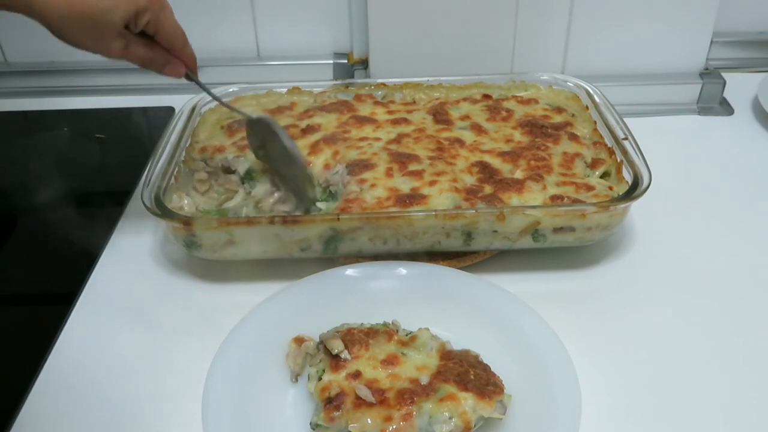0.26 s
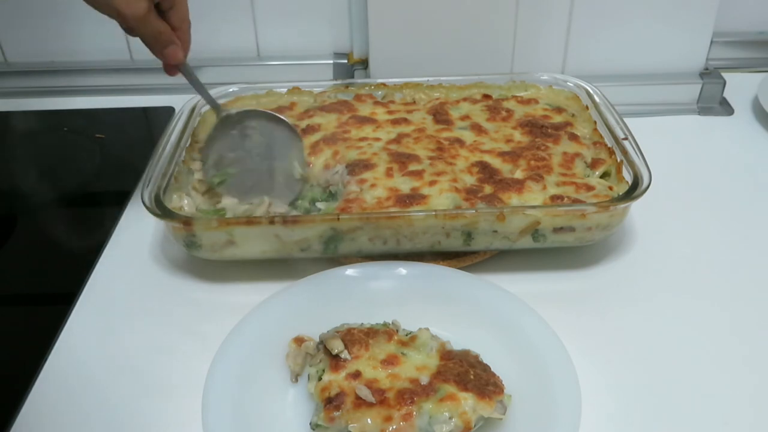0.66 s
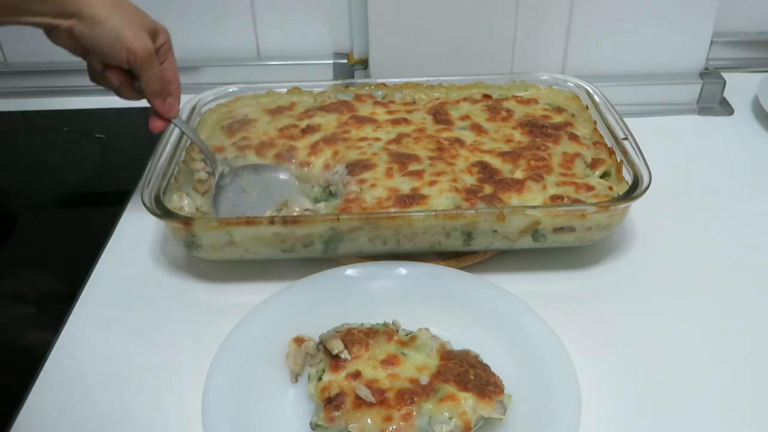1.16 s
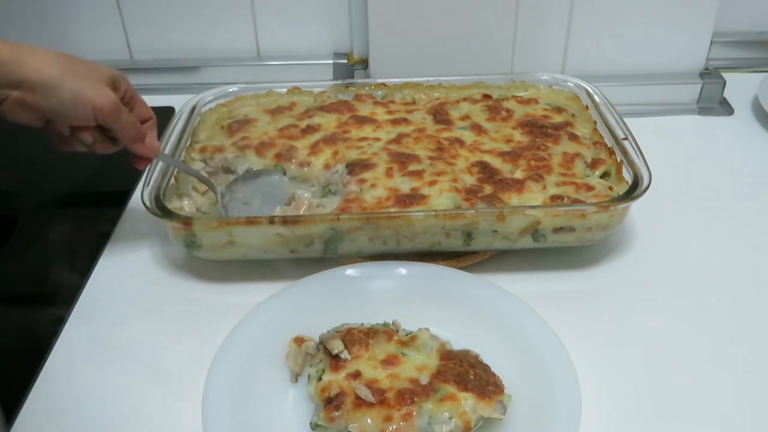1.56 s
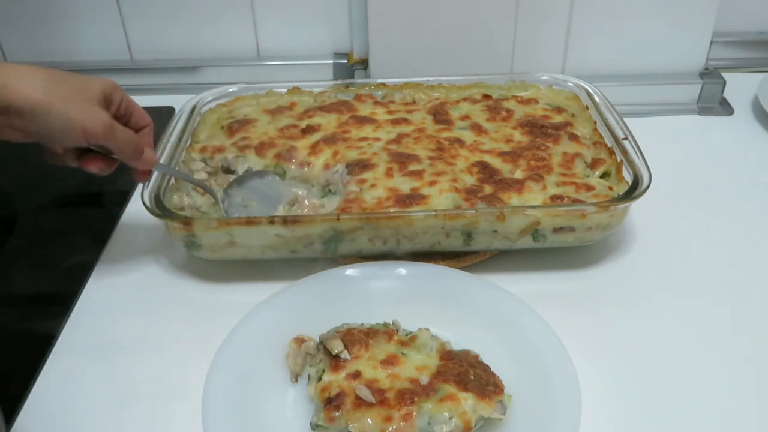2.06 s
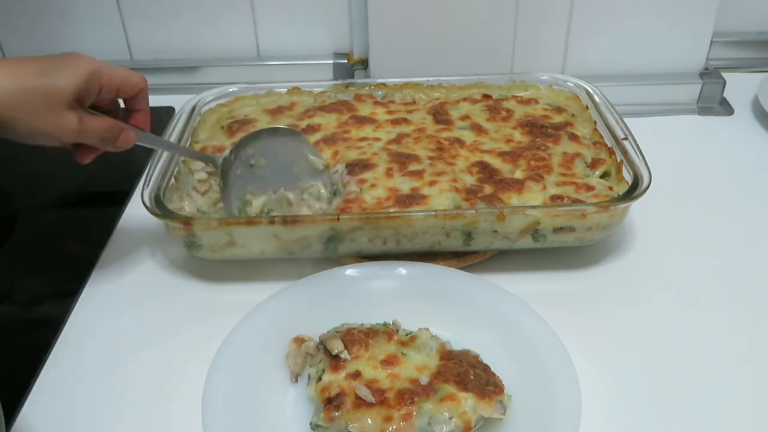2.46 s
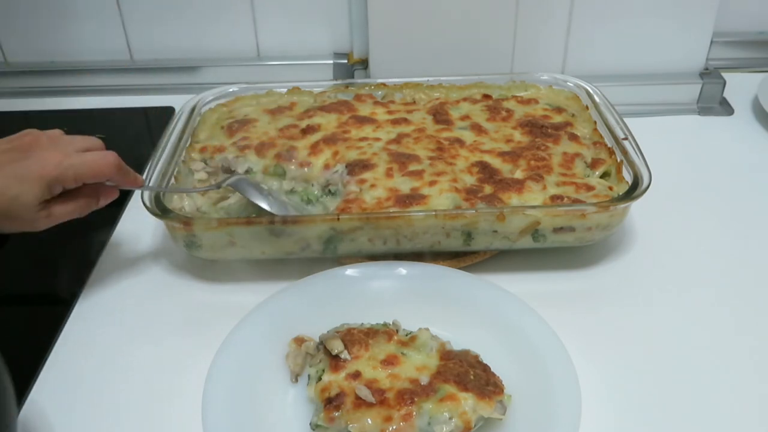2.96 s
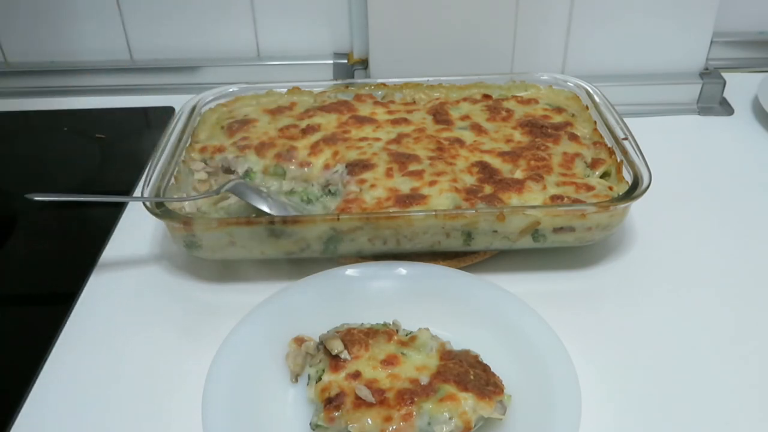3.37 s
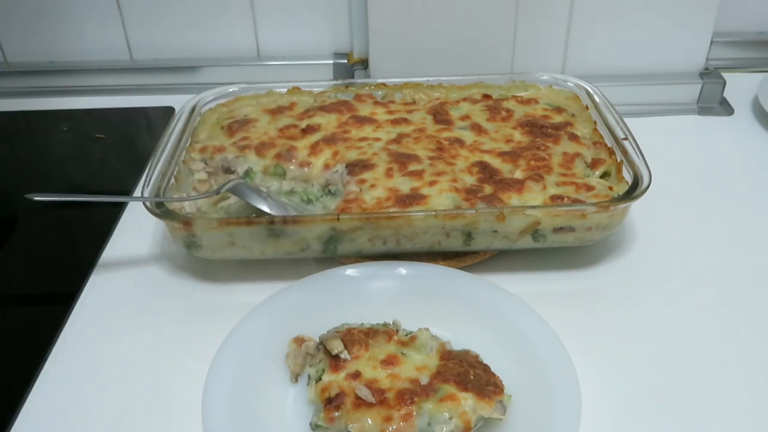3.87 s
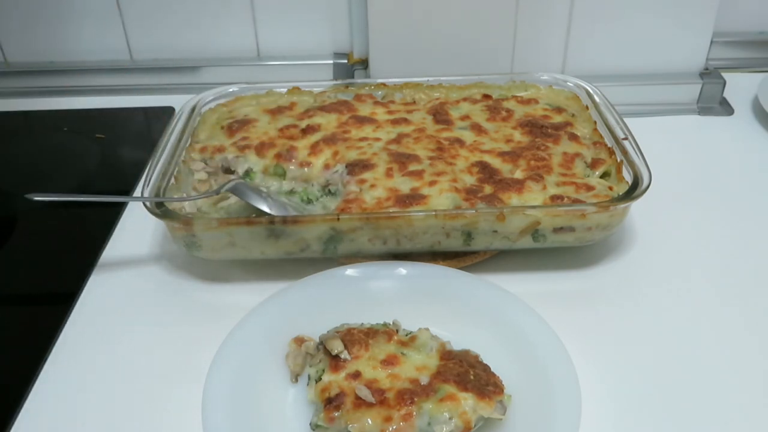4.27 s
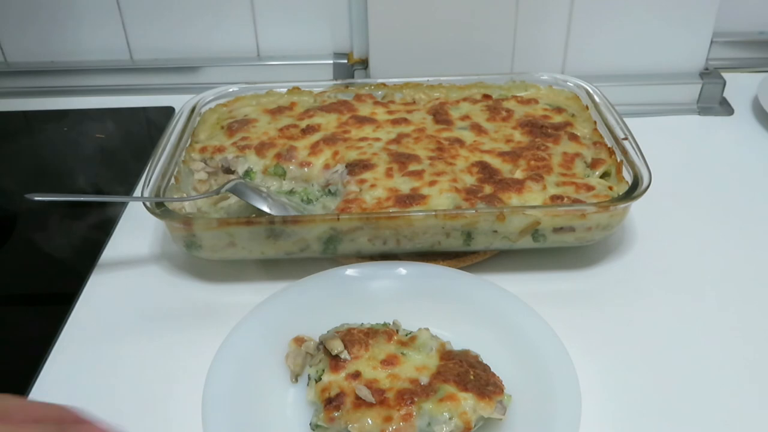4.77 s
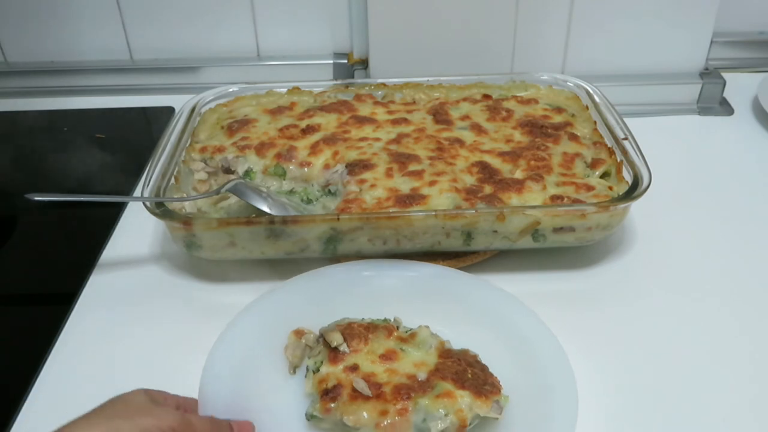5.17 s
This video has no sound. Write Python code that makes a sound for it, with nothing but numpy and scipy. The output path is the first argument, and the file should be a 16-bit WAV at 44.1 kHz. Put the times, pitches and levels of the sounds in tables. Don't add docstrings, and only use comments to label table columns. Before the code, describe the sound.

In a small tiled kitchen with a constant low appliance hum, a metal serving spoon raps a food-filled glass dish several times, rubs lightly and stirs moist food. It scrapes with a short singing tone, drops with a loud clack and clinks again. After soft rustles, a plate thumps down on the counter, rattles and is nudged. Close stereo microphone.

```python
import sys
import numpy as np
from scipy import signal
from scipy.fft import rfft, irfft, next_fast_len
from scipy.io import wavfile

SR = 44100
rng = np.random.default_rng(int(sys.argv[2]) if len(sys.argv) > 2 else 0)


def convert_level_to_amplitude(level_db):
    exponent = np.asarray(level_db, float) / 20
    return 10 ** exponent


def materialize(psi):
    bounded = np.clip(np.atleast_2d(psi).T, -1, 1)
    quanta = np.round(bounded * 32767).astype(np.int16)
    wavfile.write(sys.argv[1], SR, quanta)


N = 238580

# freq_hz, width_hz, level_db
TURN_MODES = [(780, 130, -3.5), (870, 66, -0.5), (1020, 55, 0), (1253, 120, -5.5), (1530, 71, -2.5),
              (1670, 78, -1), (1850, 43, -6), (2130, 39, -12), (2634, 81, -14), (6850, 200, -28)]


def rms_one(x):
    return x / np.sqrt(np.mean(x ** 2) + 1e-20)


def peak_one(x):
    return x / np.abs(x).max()


def spectrum(points, size):
    hz = np.maximum(np.arange(size // 2 + 1) * SR / size, 1)
    p = np.array(points)
    return convert_level_to_amplitude(np.interp(np.log(hz), np.log(p[:, 0]), p[:, 1]))


def colour(x, points):
    size = x.shape[-1]
    return irfft(rfft(x) * spectrum(points, size), size)


def thud(points, size):
    cepstrum = irfft(np.log(spectrum(points, size)), size)
    cepstrum[1:size // 2] *= 2
    cepstrum[size // 2 + 1:] = 0
    return irfft(np.exp(rfft(cepstrum)), size)


def band(x, lo_hz, hi_hz):
    return signal.sosfilt(signal.butter(2, [lo_hz, hi_hz], "band", fs=SR, output="sos"), x)


def body(x, modes, sharp=0.94):
    out = 0
    for k, (hz, width_hz, db) in enumerate(modes):
        r = np.exp(-np.pi * width_hz / sharp / SR)
        b = (1 - r * r) / 2 * np.array([1, 0, -1]) * convert_level_to_amplitude(db) * (-1) ** k
        a = [1, -2 * r * np.cos(2 * np.pi * hz / SR), r * r]
        out = out + signal.lfilter(b, a, x + 1e-18)
    return out


def stereo(mid, side):
    # freq_hz, side_minus_mid_db
    side_share = [(60, -75), (150, -28), (380, -12), (950, -8), (2380, -4.5), (5980, -0.5), (15000, 1)]
    side = colour(side, side_share)
    return np.array([mid + side, mid - side])


def grit(per_s, spread_db, size):
    sizes = convert_level_to_amplitude(spread_db * np.minimum(rng.exponential(1, size), 4)) * rng.choice([-1, 1], size)
    return rms_one(sizes * (rng.random(size) < per_s / SR))


def drift(rate_hz, size):
    knots = rng.standard_normal(size // 256 + 2)
    return np.interp(np.arange(size) / SR * rate_hz, np.arange(len(knots)), knots)


def add(out, piece, s):
    at = round(s * SR)
    out[at:at + len(piece)] += piece[:N - at]


def hum():
    # freq_hz, width_hz, level_db
    drone = [(90.5, 9.8, -11.5), (129.7, 5.3, -4.5), (159.5, 6.45, -5.5), (203.3, 8.9, -9.5),
             (221.3, 17, -12), (302.8, 14, -13), (401.2, 12, -11.5), (422, 27, -18.5)]
    # freq_hz, level_db
    mains = [(53.5, -50), (126.6, -42.5), (400, -52.5)]
    # freq_hz, density_db
    air = [(15, -10), (35, 6), (48, -35.5), (65, -5), (100, -9), (170, -17), (300, -15), (450, -17),
           (560, -16), (1070, -24), (3000, -33), (12200, -49), (16000, -57)]
    # freq_hz, width_hz, level_db
    whine = [(10500, 270, -5.5), (12500, 170, 9.5)]
    t = np.arange(N) / SR
    channels = []
    for noise in rng.standard_normal((2, 3, N)):
        low = convert_level_to_amplitude(-39) * rms_one(body(noise[0], drone))
        hiss = convert_level_to_amplitude(-42) * rms_one(colour(noise[1], air))
        channels.append(low + hiss + convert_level_to_amplitude(-79) * rms_one(body(noise[2], whine)))
    mid, side = channels
    for hz, db in mains:
        mid = mid + np.sqrt(2) * convert_level_to_amplitude(db) * np.sin(2 * np.pi * hz * t)
    return stereo(mid, side)


def knocks():
    # contact_s, peak_db, ring_share_db, ring_length_factor, crack_db
    blows = [(0.5541, -6, 2, 0.91, -24), (0.7181, -10.5, 5.5, 1.1, -14), (1.1537, -15.5, -1, 0.61, -11),
             (2.0286, -25, -1, 0.72, -13), (2.8578, -1.5, -3, .55, -12), (3.1488, -9.5, -3.5, 0.67, -11),
             (4.2575, -2.5, -6, 0.32, -13.5), (4.3197, -8.5, -6.5, 0.256, -17.5),
             (4.4548, -12, -9, 0.55, -31), (5.191, -28, -5, 1, -16), (5.2165, -28, 2.5, 1, -18)]
    # tick_ahead_s, chatter_share, chatter_length_s, ring_to_room_db
    landings = [(.0007, 0.043, .001, -11), (.0005, .2, .002, -12), (.0003, 0.14, 0.00097, -7),
                (.0007, .05, 0.00092, -7), (.0016, 0.094, 0.0011, -7), (.0007, .1, .0015, 0),
                (.0007, .03, 0.0013, -2), (.0003, 0.13, 0.0021, -2.5), (.001, .25, .002, -8),
                (.001, .3, .003, -10), (.002, .5, 0.0058, -10)]
    # start_s, level_db against its knock
    rebounds = [(0.5639, -8), (.7232, -8), (2.8655, -11.5), (2.869, -11), (3.1584, -7.5), (3.1803, -12.5),
                (4.259, -6), (4.269, -15), (4.2793, -12), (4.293, -16), (4.3216, -11), (4.4584, -1),
                (4.4695, -4), (4.4775, -4.5), (4.488, -8), (4.4946, -8), (5.1953, 1.5), (5.2265, -6)]
    # freq_hz, width_hz, level_db
    rim = [(1020, 87, -4.5), (1240, 57, -5), (1536, 94, 0.5), (1880, 68, -2), (2080, 55, -17),
           (2770, 130, -6.5), (3510, 140, -10), (4220, 280, -21), (5190, 120, -20), (6420, 106, -28),
           (7060, 190, -24)]
    bowl = [(1300, 99, -5), (1550, 100, 2), (1880, 140, -3), (2190, 71, -3.5), (2700, 130, -6.5),
            (3620, 164, -11), (4080, 108, -1), (4360, 80, -4), (5260, 88, -7), (7290, 270, -20.5),
            (8410, 220, -18), (10560, 100, -31), (12900, 155, -22.5)]
    corner = [(600, 83, 0), (700, 30, -8), (780, 24.5, -20), (1500, 30, -8), (1735, 32, 5), (1880, 4.5, 2),
              (2610, 41, -8), (3280, 107, -2.5), (3620, 190, -4.5), (4116, 37, -9), (5680, 160, -8.5),
              (9100, 51, -33)]
    bottom = [(535, 110, 8), (1016, 33, 1), (1474, 40, -3), (1880, 50, 1), (2620, 54, -18.5),
              (3820, 61, -1), (6450, 83, -30)]
    drop = [(670, 150, -7), (1003, 49, 4), (1400, 110, -14), (1582, 16, 8), (1765, 120, 0), (2220, 33, -4),
            (2600, 29, -3.5), (3430, 33, -30.5), (4070, 80, -40), (5460, 73, -14), (6700, 120, -23),
            (10100, 81, -39)]
    handle = [(576, 26, 2), (989, 35, 10.5), (1020, 17, -21), (1500, 13, 10), (1690, 17, 16.5),
              (1920, 47, 11.5), (2100, 67, -8), (2760, 33, 6), (3043, 89, 6), (3520, 74, -2),
              (5660, 31, -3), (8200, 64, -20)]
    plate = [(418, 44, -1), (485, 43, -1.5), (545, 43, 2.5), (720, 54, 9.5), (809, 26, -2),
             (1270, 73, -1.5), (1390, 88, 0), (2330, 140, -10), (3170, 66, -6), (4090, 60, -8.5)]
    table = [(480, 48, -3), (820, 61, -1.5), (1160, 51, 1), (1600, 30, -9), (1970, 43, -6),
             (2620, 110, -11), (3100, 206, -18), (4240, 390, -31)]
    nudge = [(1160, 160, -1), (1850, 80, -7), (3670, 91, -9), (4060, 150, -15), (4530, 91, -10),
             (5120, 86, -14), (6340, 92, -19)]
    # freq_hz, density_db
    rim_thud = [(200, -18), (500, -20), (750, -4.5), (1050, -0.5), (1600, 3), (2200, 5), (2800, 4),
                (3500, 0), (4400, -10), (5200, -21), (9000, -26), (15000, -34)]
    bowl_thud = [(200, -38), (600, 4.5), (1300, 8.5), (2000, 5.5), (2900, -1.5), (4300, -1), (5300, -1),
                 (6000, -15), (10000, -26), (15000, -63)]
    corner_thud = [(150, -33), (300, -6), (579, -3), (652, 6), (951, -13.5), (1670, 7), (2280, -15.5),
                   (5750, -19), (15000, -41)]
    bottom_thud = [(260, -21), (450, -22), (994, 4.5), (1350, -13), (1870, -5.5), (2260, -30), (15000, -28)]
    drop_thud = [(150, -55.5), (350, -2), (700, -1), (1100, 11), (1800, 1.5), (2700, 10), (5300, 2),
                 (9000, -15), (14000, -20)]
    handle_thud = [(300, -47), (600, -22), (950, -0.5), (1700, 11.5), (2800, 6), (3500, -7), (4500, -5),
                   (8000, -20), (14000, -24)]
    plate_thud = [(120, -20), (250, -15), (450, 6.5), (800, 4.5), (1250, 1), (1800, -9), (3000, -19),
                  (8000, -36), (13000, -26)]
    table_thud = [(180, -36), (300, -14), (498, -2), (800, -8), (1150, -8.5), (1520, -7), (2100, -6),
                  (3170, -14), (4500, -26), (15000, -53)]
    nudge_thud = [(290, -54), (500, 4), (766, -2), (1160, -2), (2260, -13), (3610, -11), (5000, -16),
                  (15000, -48)]
    rings = [rim, bowl, corner, bottom, drop, handle, plate, plate, table, nudge, nudge]
    thuds = [rim_thud, bowl_thud, corner_thud, bottom_thud, drop_thud, handle_thud,
             plate_thud, plate_thud, table_thud, nudge_thud, nudge_thud]
    wall_wait_s = .007
    ring_delay = round(.009 * SR)
    out, t = np.zeros((2, N)), np.arange(8192) / SR
    click = 1. * (t == 0)
    parents = np.searchsorted([blow[0] for blow in blows], [again[0] for again in rebounds]) - 1
    for k, (s, db, ring_db, ring_length, crack_db) in enumerate(blows):
        lead_s, share, chatter_s, room_db = landings[k]
        ring = convert_level_to_amplitude(ring_db) * peak_one(body(click, rings[k], ring_length))
        dull = peak_one(thud(thuds[k], len(t)))
        burst = rng.standard_normal(len(t)) * np.exp(-t / 0.0022)
        cracks = band(np.array([burst, np.sqrt(np.sum(burst ** 2)) * click]), 2240, 14500)
        chatter = click + share * rng.standard_normal(len(t)) * np.exp(-t / chatter_s)
        chatter = chatter / np.sqrt(np.sum(chatter ** 2))
        near = signal.fftconvolve(dull + ring, chatter)[:len(t)]
        to_walls = dull + convert_level_to_amplitude(room_db) * np.roll(ring, ring_delay)
        for row, crack, hit, wait_s in zip(out, cracks, (near, to_walls), (0, wall_wait_s)):
            add(row, convert_level_to_amplitude(db + crack_db) * crack, s - lead_s)
            add(row, convert_level_to_amplitude(db) * hit, s)
            softer = band(hit, 150, 5000)
            for (again_s, again_db), parent in zip(rebounds, parents):
                if parent == k and again_s - s > wait_s:
                    add(row, convert_level_to_amplitude(db + again_db) * softer, again_s)
    return out


def scrapes():
    # first_contact_s, full_pressure_s, end_s, rub_db, hiss_minus_rub_db
    strokes = [
        (0.735, .76, 0.9, -43.5, -6),
        (0.95, 0.983, 1, -44.5, -12),
        (1.028, 1.032, 1.22, -44.5, -6.5),
        (2.35, 2.485, 2.562, -32, -13.5),
        (2.549, 2.58, 2.7, -37, -25),
        (2.626, 2.634, 2.79, -33, -29),
        (2.695, 2.827, 2.947, -36.5, -16),
        (2.44, 2.455, 2.48, -36.5, -30),
        (2.365, 2.395, 2.45, -40, -20),
    ]
    # freq_hz, width_hz, level_db
    wall = [(1820, 60, -2), (2696, 70, -11), (3440, 260, -17), (4040, 200, -19), (4570, 120, -16.5),
            (5500, 250, -20), (6900, 330, -19.5), (7600, 250, -19), (9320, 270, -29), (12400, 300, -24)]
    lift = [(1310, 300, -21), (1863, 66, -7), (2104, 23.9, 2.5), (2697, 230, -19.5), (3120, 250, -19.5),
            (3550, 250, -20.5), (3960, 250, -22.5), (5130, 180, -14), (7180, 300, -23), (10400, 300, -31),
            (14000, 1100, -36)]
    fade = [(2080, 27, 0), (5140, 200, -29), (7060, 150, -24)]
    rise = [(2620, 81, -4), (3220, 100, -3), (4170, 330, -19), (4680, 300, -19)]
    catch = [(1200, 90, -4), (1890, 90, -1), (3100, 200, -12)]
    begin = [(1900, 90, 0), (2300, 200, -10), (3480, 130, -4), (4700, 250, -14)]
    singers = [wall, wall, wall, lift, fade, TURN_MODES, rise, catch, begin]
    touchdown_db, let_go_db_per_s = -20.5, 346
    sag_per_db, wander = .003, .003
    hiss_follows = 1.4
    skirt = 4.7
    out, n = np.zeros(N), np.arange(SR // 2)
    for (start, full, end, db, hiss_db), modes in zip(strokes, singers):
        t = start + n / SR
        press_db = np.interp(t, [start, full], [touchdown_db, 0])
        pitch = 1 + sag_per_db * press_db + wander * drift(14.06, len(n))
        read = np.cumsum(np.clip(pitch, .85, 1.1))
        press_db = press_db - let_go_db_per_s * np.maximum(t - end, 0)
        slips = grit(2500, spread_db=3.0, size=len(n)) * convert_level_to_amplitude(1.8 * drift(30, len(n)))
        sing = 0
        for hz, width_hz, level_db in modes:
            mode = body(body(slips, [(hz, width_hz, level_db)]), [(hz, skirt * width_hz, 0)])
            sing = sing + convert_level_to_amplitude(3.2 * drift(29.5, len(n))) * mode
        sing = np.interp(read, n, rms_one(sing))
        rub = sing + 0.23 * rms_one(band(band(slips, 650, 2400), 650, 2670))
        hiss = convert_level_to_amplitude(hiss_db + hiss_follows * press_db) * rms_one(band(slips, 2240, 13600))
        add(out, convert_level_to_amplitude(db - 8.0) * (convert_level_to_amplitude(press_db) * rub + hiss), start)
    return out


def touches():
    # start_s, peak_db, centre_hz, length_s
    contacts = [(1.031, -30.5, 2220, 0.003), (1.347, -32.5, 1020, 0.0034), (1.566, -31, 1070, 0.0017),
                (1.689, -44.5, 1500, 0.032), (1.754, -41, 1600, 0.0046), (2.224, -41.5, 1810, 0.015),
                (2.633, -24, 1400, 0.003), (3.475, -40, 2020, 0.016), (3.686, -39.5, 1600, 0.0141),
                (4.67, -33, 2000, 0.015), (5.14, -35.5, 780, 0.004), (5.36, -34.5, 480, 0.0056)]
    out, t = np.zeros(N), np.arange(SR // 4) / SR
    for s, db, hz, length_s in contacts:
        rub = (t == 0) + 9.8 * length_s * rng.standard_normal(len(t)) * np.exp(-t / length_s)
        broad = peak_one(body(rub, [(hz, 0.42 * hz, 0)]))
        dish = 0.53 * peak_one(body(rub, TURN_MODES, 0.8))
        add(out, convert_level_to_amplitude(db) * band(broad + dish, 290, 4500), s)
    return out


def stirring():
    # end_of_swell_s, level_then_db, fall_20_db_s (negative keeps
    moves = [(1.3, -41.5, 0.3), (1.57, -44, 0.02), (1.69, -42, 0.23), (1.89, -47, 0.1), (1.99, -45, 0.03),
             (2.07, -46, 0.7), (2.225, -41, 0), (2.34, -50, 0.5), (3.35, -45, 0.1), (3.482, -55, 0.3),
             (3.7, -43, 0.06), (3.9, -56, 0.5), (4.19, -58, 1.5), (4.681, -37.5, 0.01), (5.14, -46.5, 0.5),
             (5.225, -36, 0.1), (5.3, -45.5, -4), (5.345, -43.5, -4)]
    # freq_hz, density_db
    wet_colour = [(290, -15), (500, 0.5), (936, -15), (1020, -14), (1270, -14.5), (1590, -9.5),
                  (14000, -42)]
    attack_s = 0.021
    t, gain = np.arange(N) / SR, 0
    for s, db, fall_s in moves:
        gain = gain + convert_level_to_amplitude(db + 20 * np.minimum((t - s) / attack_s, (s - t) / np.float64(fall_s)))
    return convert_level_to_amplitude(-12.0) * gain * rms_one(colour(grit(2500, spread_db=1.5, size=N), wet_colour))


def kitchen(x, sent, lag_s, wet_db, echo_db):
    # freq_hz, t60_s, level_db
    decay = [(233.7, 0.85, 11), (614, 0.25, 5.5), (1200, 0.29, 7.5), (2550, 0.33, 4.5), (4760, 0.34, 2),
             (8840, 0.26, -4.5), (13650, 0.26, -12)]
    # delay_s, level_db
    echoes = [(.0078, -13), (0.0106, -7.5)]
    t = np.arange(next_fast_len(SR // 2)) / SR
    early = 8
    noise = rng.standard_normal((len(decay) + 1, 2, len(t)))
    tail = 0
    for (hz, t60, db), n in zip(decay, noise):
        tail = tail + convert_level_to_amplitude(db - 60 * t / t60) * band(n, hz / 1.484, hz * 1.33)
    tail = convert_level_to_amplitude(wet_db) * tail * np.clip((t - .001) / 0.0034, 0, 1)
    near = np.zeros(len(t))
    for s, db in echoes:
        near[round(s * SR) + early] = convert_level_to_amplitude(db + echo_db)
    smear = noise[-1, 0] * np.exp(-t / 0.0029) * (t > early / SR)
    near = band(near, 150, 7000) + convert_level_to_amplitude(-21) * band(smear, 3500, 16000)
    near[early:] += convert_level_to_amplitude(3) * band(1. * (t[:-early] == 0), 20, 8500)
    turn = np.exp(1j * np.pi * np.arange(len(t) // 2 + 1) / t[-1] * lag_s)
    ports = np.array([irfft(rfft(near) * turn, len(t)), irfft(rfft(near) / turn, len(t))])
    walls = signal.fftconvolve(sent[None], stereo(tail[0], convert_level_to_amplitude(-9) * tail[1]), axes=1)
    return (signal.fftconvolve(x[None], ports, axes=1) + walls)[:, early:N + early]


def scene():
    scrape = scrapes()
    x = knocks() + touches() + convert_level_to_amplitude(-5.5) * scrape + stirring()
    at_dish = np.arange(N) < 4.2 * SR
    dish = kitchen(*x * at_dish, lag_s=.000014, wet_db=-26.5, echo_db=1.0)
    plate_side = kitchen(*x * ~at_dish, lag_s=.00003, wet_db=-30.5, echo_db=-8)
    return dish + plate_side + 1.2 * scrape + hum()


def roll_off(x):
    return signal.sosfilt(signal.butter(12, 16460, fs=SR, output="sos"), x)


def record(dry):
    x = signal.sosfilt(signal.cheby2(6, 18, 42, "high", fs=SR, output="sos"), dry)
    over_db = np.maximum(20 * np.log10(np.abs(x).max(axis=0) + 1e-9) + 14, 0)
    release_db = 25 * np.arange(N) / SR
    held_db = np.maximum.accumulate(over_db + release_db) - release_db
    gain = convert_level_to_amplitude(-.3 * signal.lfilter([.004], [1, -.996], held_db))
    clipped = np.clip(x * gain, -1, 1)
    mix = signal.sosfilt(signal.butter(4, 15800, fs=SR, output="sos"), clipped)
    return roll_off(mix)


dry = scene()
out = record(dry)
materialize(out)
```